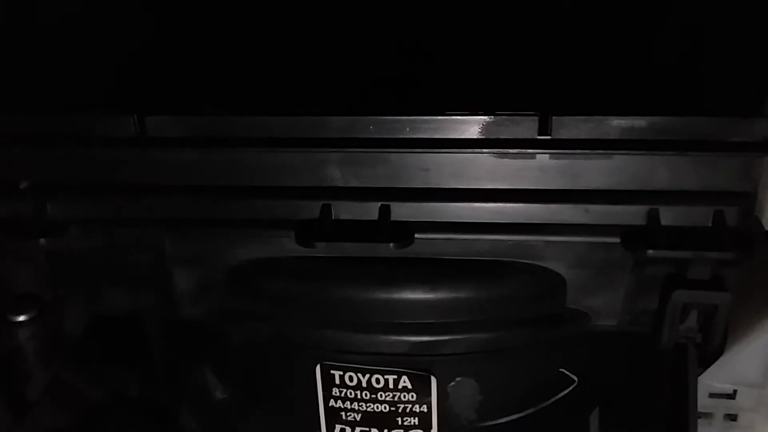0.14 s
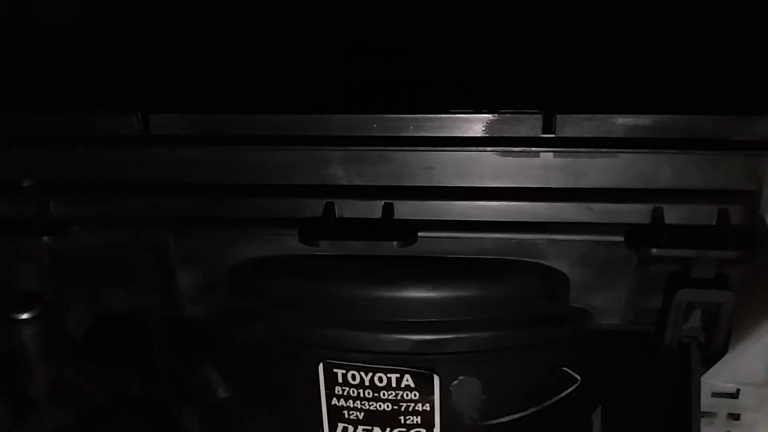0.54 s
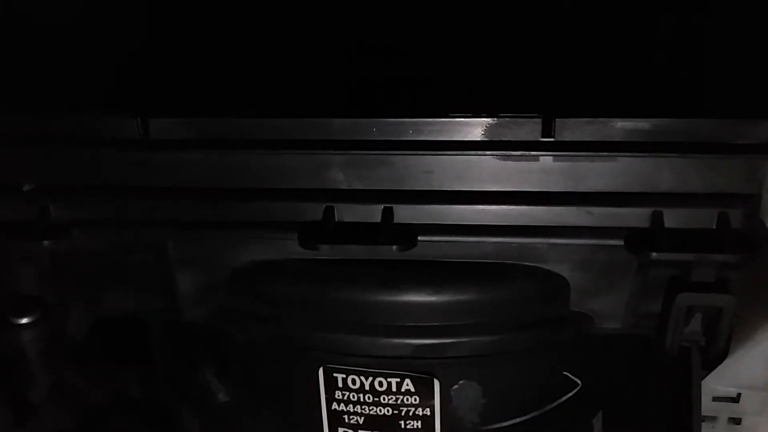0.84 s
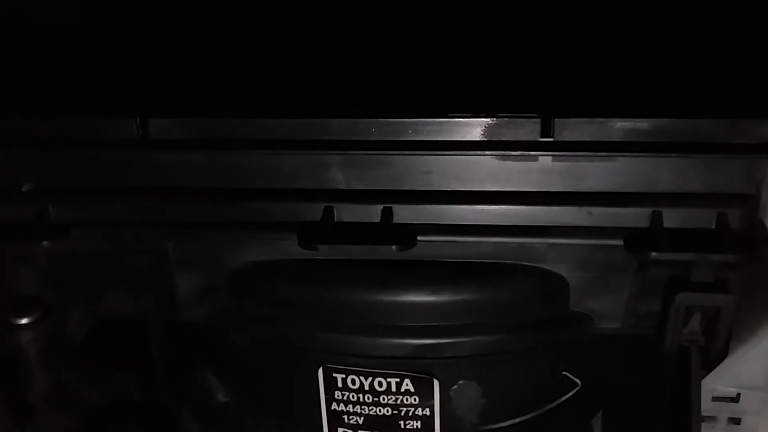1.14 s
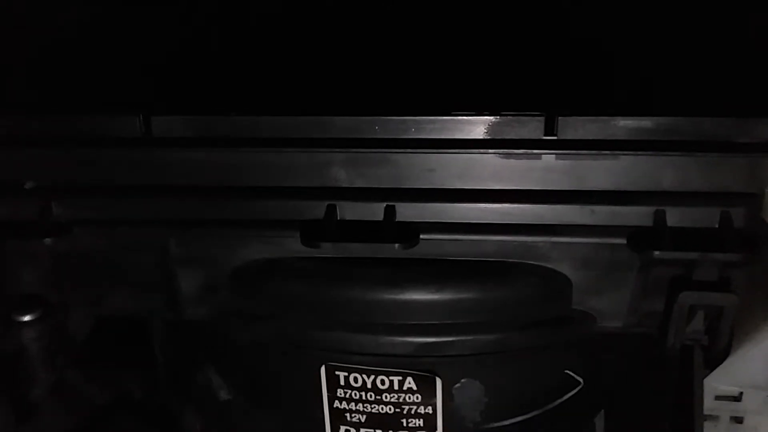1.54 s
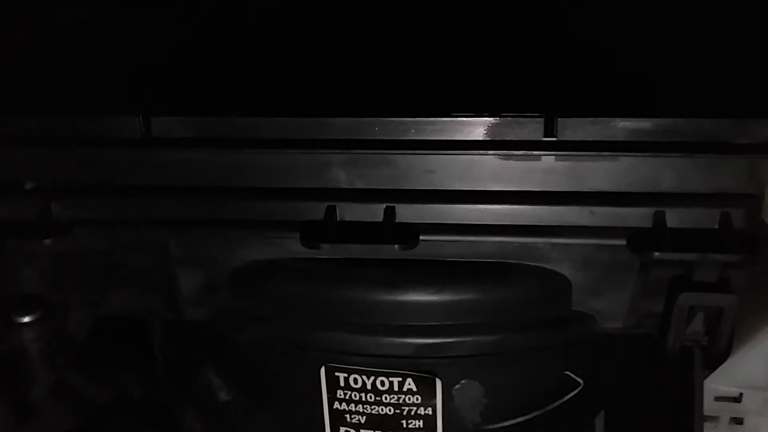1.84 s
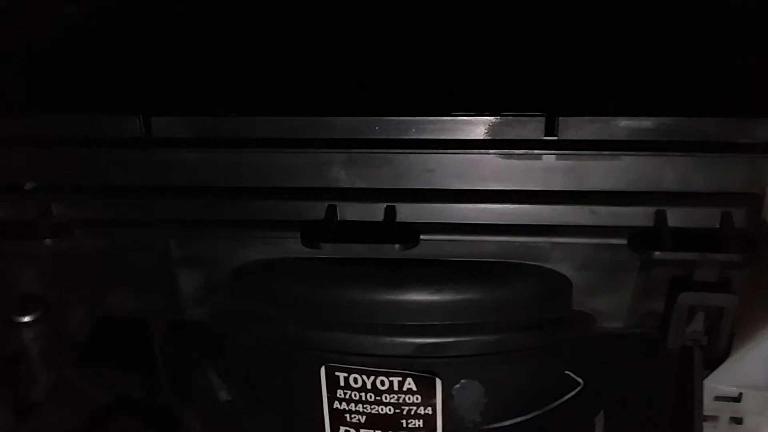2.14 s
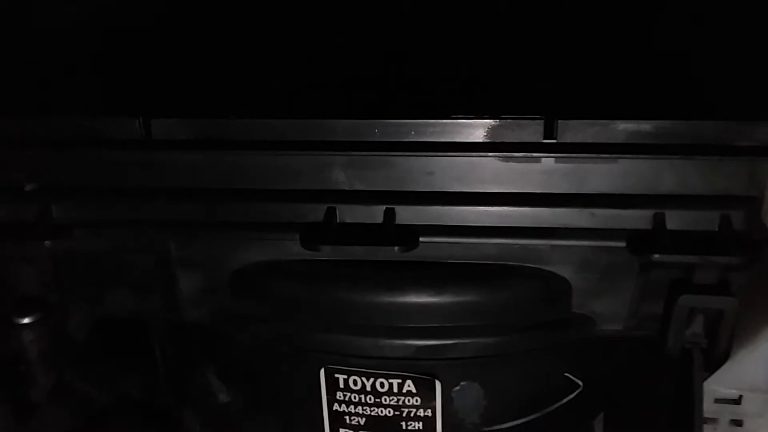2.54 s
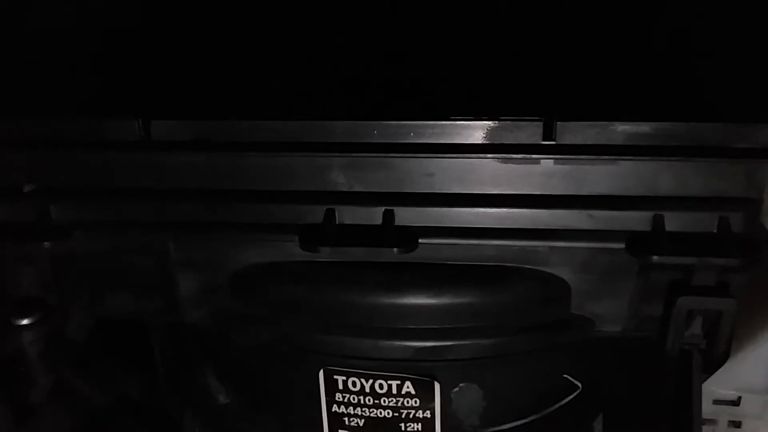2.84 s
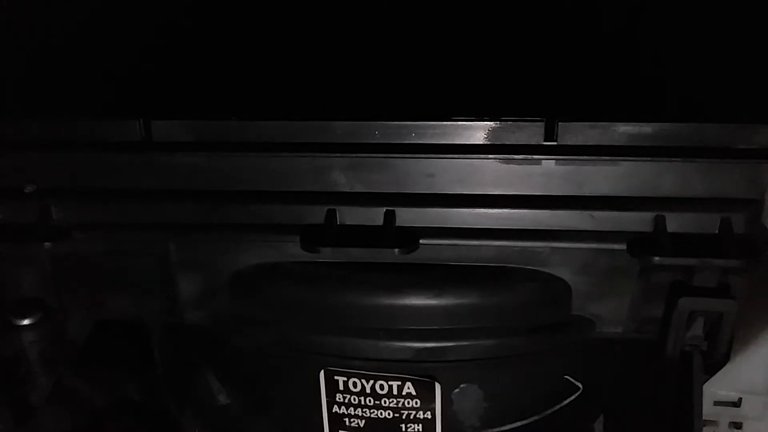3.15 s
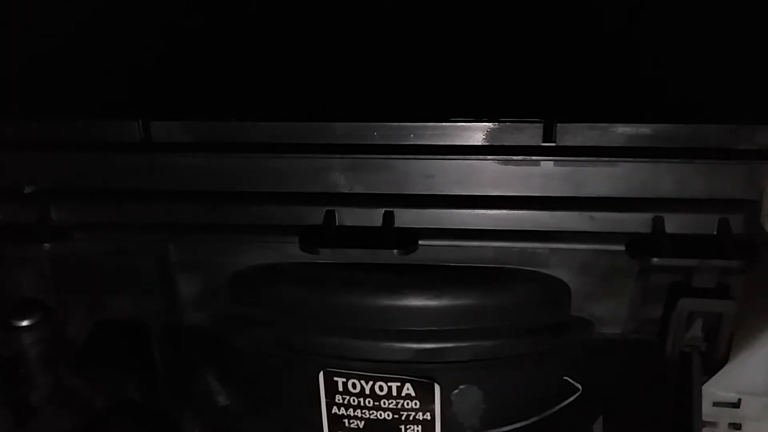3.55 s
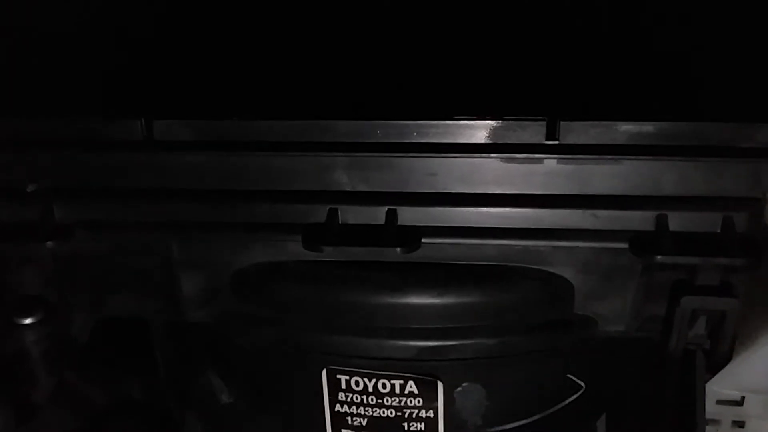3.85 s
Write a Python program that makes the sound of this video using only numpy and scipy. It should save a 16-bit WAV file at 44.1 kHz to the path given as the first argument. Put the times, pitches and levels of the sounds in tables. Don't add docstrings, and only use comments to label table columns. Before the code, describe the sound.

A car blower fan hums low and rushes with air through ringing ducts, close to a hand-held phone in the cabin. It slows at first; after a faint click near 0.4 s, a loud plastic snap at 0.54 s sends it faster, then steady. At 2.3 s a springy click drops its speed. Sharp clicks from 3.06 s switch it off; it sinks to weak hum, with another click near 3.6 s.

```python
import sys
import numpy as np
from scipy import signal
from scipy.fft import rfft, irfft
from scipy.io import wavfile
from scipy.ndimage import uniform_filter1d

SR = 44100
rng = np.random.default_rng(int(sys.argv[2]) if len(sys.argv) > 2 else 0)


def unload_audio(sound):
    columns = np.transpose(np.atleast_2d(sound))
    steps = np.round(np.clip(columns, -1, 1) * 32767)
    wavfile.write(sys.argv[1], SR, steps.astype(np.int16))


def invert_db(level):
    return 10 ** (np.asarray(level, dtype=float) / 20)


N = 176400

# [t/s, shaft f/Hz, hum level/dB, air rush level/dB]
FAN = [(0.0, 42.13, 3.5, -26), (0.15, 37.34, 1.5, -28), (0.48, 35.52, 1.5, -28.5), (0.51, 36.24, -3, -31.5),
       (0.63, 43.95, 3, -27), (0.69, 46.57, 2.5, -26.5), (0.76, 48.48, 1.5, -26), (2.05, 48.84, 3.5, -24.5),
       (2.31, 48.08, 4.5, -24.5), (2.55, 37.74, 1.5, -27.5), (3.0, 35.67, 1, -29),
       (3.05, 34.96, -3.5, -28.5), (3.14, 32.38, -1, -30.5), (3.31, 26.19, -7, -37), (3.41, 24.2, -13, -39),
       (3.53, 23.4, -20, -41.5), (3.64, 24.0, -10, -40.5), (4.0, 21.4, -4.5, -36.5)]
# [multiple, level/dB, waver/dB]
SHAFT_TONES = [(1, -17, 0), (2, -12, 1), (3, -16, 0.13), (4, -28, 3.5), (5, -35.5, -3), (6, -30.5, 4),
               (7, -30.5, -0.5), (8, -35.5, 2), (10, -42.5, 1)]
# [f/Hz, level/dB]
HOUSING_COLOUR = [(36, -44), (48, -18.5), (72, -8), (98, -1.6), (145, -7), (200, -4), (300, -9),
                  (500, -9.5)]
# [f/Hz, level/dB per Hz]
AIR_COLOUR = [(200, -0.5), (600, -15), (1500, -13), (2900, -19.5), (5000, -21.5), (7200, -33.5),
              (9500, -43.5), (15500, -51.5)]
# [f/Hz, width/Hz, lift/dB]
DUCT_RESONANCES = [(469, 150, 6.5), (899, 280, 6), (1101, 33, 4), (1421, 79, 10), (1897, 460, 5.5),
                   (2083, 41, 9.5), (3880, 120, 5), (4940, 440, 7.5), (5940, 70, 6), (6510, 230, 7.5)]
# [f/Hz, level/dB per Hz]
RUMBLE_COLOUR = [(15, -70.5), (25, -34.5), (65, 0), (155, 1), (199, -21.5), (237, -11.5), (400, -40),
                 (520, -58), (880, -120)]
# [f/Hz, level/dB]
LEFT_LEAN = [(60, -1.5), (110, -1.5), (200, -2.5), (380, 1.5), (700, 1.1), (1290, 6.8), (2380, 6.5),
             (4400, 8.0), (8120, 2.7), (15000, -3.0)]
# [f/Hz, likeness/0-1]
LIKENESS = [(40, 0.73), (70, 0.89), (130, 0.88), (290, 0.84), (640, 0.53), (1410, 0.51), (3100, 0.14),
            (6820, 0.16)]
# [t/s, peak level/dB, length/s,
# brightness/dB per octave, spring level/dB]
SWITCH_CLICKS = [(0.392, -15.5, .007, 2, -12), (.5335, -30, .005, 4, -29.5), (.5380, -6, 0.0033, .5, -24),
                 (.5440, -13, 0.0058, 2, -25), (2.3312, -18, .007, 6, -15), (2.3353, -13.5, .005, 0, 4),
                 (3.057, -25.5, 0.0036, 7, -30), (3.0600, -7.5, 0.0034, 1.5, -26),
                 (3.065, -19, .008, 3.5, -14), (3.1255, -26, .006, 5, -27), (3.1318, -17, 0.0068, 2.5, -20),
                 (3.5126, -28.5, 0.0068, -5.5, -30), (3.5896, -32, .006, -2.5, -32),
                 (3.623, -14, 0.0065, 0, -26), (3.782, -30.5, .008, -6, -30), (3.6156, -30, .006, 4.5, -30),
                 (.002, -28.5, .008, 6, -30)]
# [f/Hz, level/dB, time to fall 60 dB/s]
SWITCH_BODY = [(1150, -16, .025), (1450, -20, .02), (1940, -13, .015), (2490, -13, .015)]
# [f/Hz, level/dB]
SNAP_COLOUR = [(700, -33), (1300, -8.5), (2300, 5), (3500, -5), (5000, -6), (6500, -12.5), (8000, -21.5),
               (15500, -28.5)]
# [t/s, level/dB, half width/s]
LEVEL_DIPS = [
    (.54, -5.5, 0.021),
    (3.06, -3.5, 0.019),
    (3.625, -2.5, .015),
]

WAVER_HZ, SPEED_JITTER = 9.9, 0.0029
SWELL_DB, FLICKER_DB, BRIGHT_DB_PER_OCT = -0.5, 0.64, 1.53
RUMBLE_DB, RUMBLE_FOLLOW, RUMBLE_LUMP_DB = -33, 0.57, 2.2
SPRING_HZ, SPRING_T60_S, CLICK_RISE_S = 4620, 0.033, 0.0017
CLICK_LEAN_DB, RATTLE_DB, SNAP_DB = 4.5, 3, 4
PORT_LAG_S, WOBBLE_DB, WOBBLE_HZ = 0.00018, 0.55, 10
MIC_HISS_DB, MIC_HISS_HZ, TOP_HZ = -72, 7000, 15750


def read(table, hz):
    table = np.array(table)
    return np.interp(np.log(np.maximum(hz, 1)), np.log(table[:, 0]), table[:, 1])


def unit(x):
    return x / np.sqrt(np.mean(x ** 2))


def walk(rate):
    k = int(SR / rate)
    steps = np.repeat(rng.standard_normal(N // k + 1), k)
    smooth = uniform_filter1d(uniform_filter1d(steps, k), k)
    return unit(smooth[:N])


def fan(column):
    table = np.array(FAN)
    return np.interp(np.arange(N) / SR, table[:, 0], table[:, column])


def stereo_noise(db, hz):
    like = np.clip(read(LIKENESS, hz), 0, 1)
    shared, left, right = rfft(rng.standard_normal((3, N)))
    shared = shared * np.sqrt(like)
    own = np.sqrt(1 - like)
    lean = invert_db(read(LEFT_LEAN, hz) / 2)
    late = np.exp(-2j * np.pi * hz * PORT_LAG_S)
    return invert_db(db) * np.array([(shared + own * left) * lean, (shared * late + own * right) / lean])


def hum():
    hz = fan(column=1) * (1 + SPEED_JITTER * walk(6))
    turn = 2 * np.pi * np.cumsum(uniform_filter1d(hz, size=1500)) / SR
    out = 0
    for k, db, waver_db in SHAFT_TONES:
        k = round(k)
        waver = waver_db * 1.63 * np.tanh(walk(WAVER_HZ) / 1.9)
        level = np.sqrt(2) * invert_db(db + read(HOUSING_COLOUR, k * hz) + waver)
        tone = level * np.sin(k * turn + rng.uniform(0, 2 * np.pi))
        lean = invert_db(read(LEFT_LEAN, k * hz) / 2)
        out = out + tone * np.array([lean, 1 / lean])
    return out * invert_db(fan(column=2))


def air():
    hz = np.arange(N // 2 + 1) * SR / N
    db = read(AIR_COLOUR, hz) - 40 * np.log10(1 + (150 / np.maximum(hz, 1)) ** 2)
    for centre_hz, width_hz, lift_db in DUCT_RESONANCES:
        db = db + lift_db / (1 + (2 * (hz - centre_hz) / width_hz) ** 2)
    spec = stereo_noise(db, hz)
    middle = irfft(spec.mean(0) * ((hz > 800) & (hz < 7000)), N)
    spec = spec / np.sqrt(np.mean(middle ** 2))
    flow, swell, out = fan(column=3), walk(1.565), 0
    place = 2 * np.log2(np.maximum(hz, 1) / 50)
    for k in range(18):
        share = np.cos(np.pi / 2 * np.clip(place - k, -1, 1)) ** 2
        tilt = BRIGHT_DB_PER_OCT * (k - 10) / 2 * (flow - flow.max()) / 10
        level = invert_db(flow + tilt + SWELL_DB * swell + FLICKER_DB * walk(12))
        out = out + irfft(spec * share, N) * level
    return out


def ring(f, db, t60):
    t = np.arange(4096) / SR
    tone = np.sin(2 * np.pi * f * t) * 1000. ** (-t / t60)
    return rfft(unit(tone)) * invert_db(db) / 64


def switch():
    out = np.zeros((2, N + 4096))
    t = np.arange(4096) / SR
    hz = np.arange(2049) * SR / 4096
    lean = invert_db((read(LEFT_LEAN, hz) + CLICK_LEAN_DB) * np.array([[.5], [-.5]]))
    for s, peak_db, length, tilt_db, spring_db in SWITCH_CLICKS:
        shape = (1 - np.exp(-t / CLICK_RISE_S)) * np.exp(-(t / length) ** 2)
        noise = rng.standard_normal((2, len(t)))
        rattle = invert_db(RATTLE_DB * rng.standard_normal(len(t)))
        ticks = rfft(shape * noise * rattle)
        ticks = ticks / np.sqrt(uniform_filter1d(abs(ticks) ** 2, size=50))
        body = sum(ring(*mode) for mode in SWITCH_BODY) + invert_db(SNAP_DB + read(SNAP_COLOUR, hz))
        body = body * invert_db(tilt_db * np.log2(np.clip(hz, 500, SR) / 2000))
        body = body + ring(SPRING_HZ, spring_db, SPRING_T60_S)
        click = irfft(ticks * body * lean)
        click = click / np.sqrt(np.sum(click ** 2) / (length * SR))
        i = int(s * SR)
        out[:, i:i + len(t)] += click * invert_db(peak_db)
    return out[:, :N]


def rumble():
    hz = np.arange(N // 2 + 1) * SR / N
    flow = fan(column=3)
    low = unit(irfft(stereo_noise(read(RUMBLE_COLOUR, hz), hz) * (hz > 20) * (hz < 400), N))
    return low * invert_db(RUMBLE_DB + RUMBLE_FOLLOW * (flow - flow[-1]) + RUMBLE_LUMP_DB * walk(8))


def mic_hiss():
    high = signal.butter(2, MIC_HISS_HZ, "high", fs=SR, output="sos")
    hiss = signal.sosfilt(high, rng.standard_normal((2, N)))
    return invert_db(MIC_HISS_DB) * unit(hiss)


def scene():
    t = np.arange(N) / SR
    dip_db = sum(db * np.exp(-((t - s) / width) ** 2) for s, db, width in LEVEL_DIPS)
    blower = hum() + air() + rumble()
    return blower * invert_db(WOBBLE_DB * walk(WOBBLE_HZ) + dip_db) + switch()


def low_pass(x):
    return signal.sosfilt(signal.butter(12, 15710, fs=SR, output="sos"), x)


def record(dry):
    opening = np.clip(np.arange(N) / 100, 0, 1)
    top = signal.ellip(10, .2, 80, TOP_HZ, fs=SR, output="sos")
    clipped = np.clip((dry + mic_hiss()) * opening, -1, 1)
    mix = signal.sosfilt(top, clipped)
    return low_pass(mix)


dry = scene()
out = record(dry)
unload_audio(out)
```